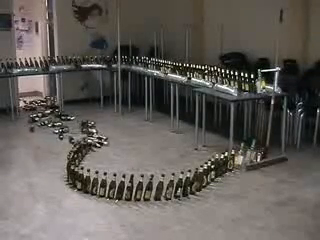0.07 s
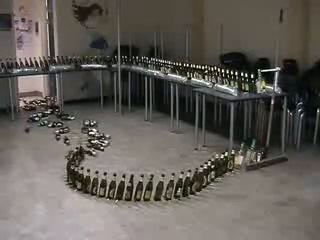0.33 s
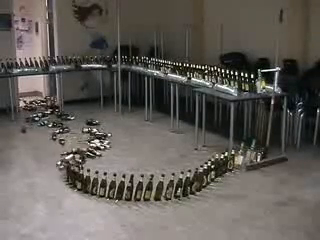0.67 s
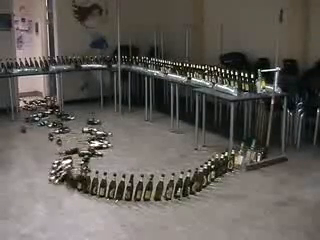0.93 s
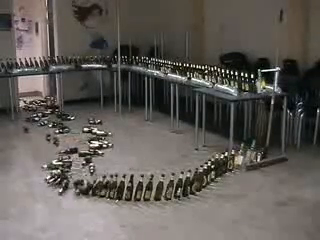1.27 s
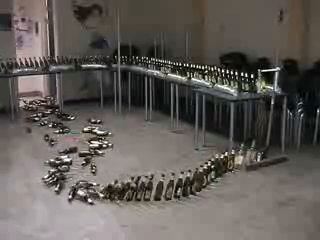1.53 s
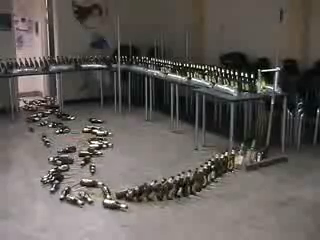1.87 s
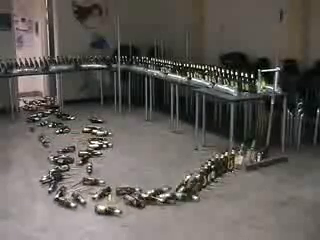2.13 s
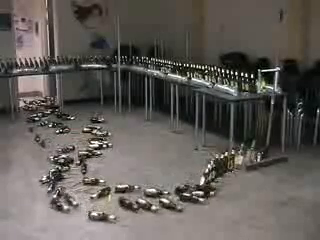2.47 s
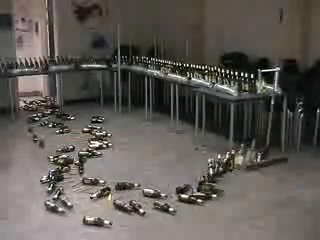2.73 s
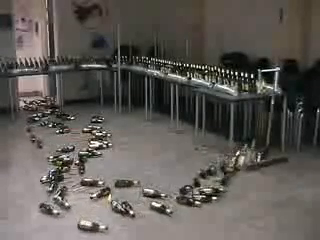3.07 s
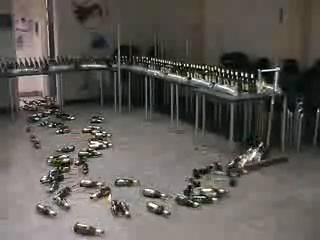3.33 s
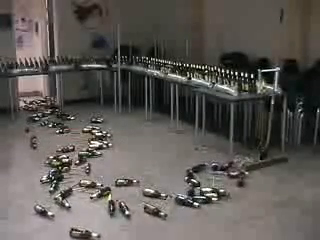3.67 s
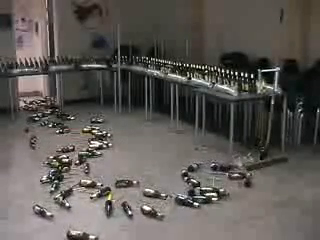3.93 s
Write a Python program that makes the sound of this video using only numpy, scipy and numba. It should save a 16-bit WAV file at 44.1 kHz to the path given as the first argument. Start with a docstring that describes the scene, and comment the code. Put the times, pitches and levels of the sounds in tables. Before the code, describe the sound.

A chain of falling glass bottles makes quick, ringing clinks and sharp clicks over steady rattling on a hard floor. A few larger bottles then collide and drop with a duller clatter, with a short echo from bare walls.

```python
"""Glass bottles topple like dominoes across the concrete floor of a bare room.
Each small bottle strikes its neighbour and rings in a few bright modes; glancing taps ping, hard hits
snap, sliding glass squeaks. The fallen bottles knock on the floor, rattle and roll. After three
seconds the wave reaches a few big bottles that ring lower, and the last ones tumble with a dull,
hollow clatter. The bare walls add a short tail."""
import sys
import numpy as np
from scipy import signal
from scipy.fft import rfft, irfft
from scipy.io import wavfile
from numba import njit

SR = 44100
rng = np.random.default_rng(int(sys.argv[2]) if len(sys.argv) > 2 else 0)


def int16_out(signal):
    """Quantize to a 16-bit WAV file."""
    q = np.round(np.clip(np.atleast_2d(signal).T, -1, 1) * 32767)
    wavfile.write(sys.argv[1], SR, q.astype(np.int16))


N = 176400
TIME = np.arange(N) / SR

# small bottle on small bottle: start_s, level_db, pitch_hz, middle_modes_db
CLINK_CUES = [(0.1186, -12.5, 4113, -13), (0.1997, -15.5, 4190, -15), (0.5411, -17, 4080, -1.5),
              (0.635, -16, 3995, -11), (0.908, -13.5, 4088, -16), (1.0018, -12.5, 4050, -13.5),
              (1.0782, -21.5, 4040, 16), (1.099, -21.5, 4103, 4), (1.1976, -10, 4110, -25.5),
              (1.292, -12, 3988, -1.5), (1.4238, -13.5, 4090, -28), (1.5184, -9.5, 4226, -19.5),
              (1.6105, -12, 4102, -25), (1.7316, -11.5, 4030, -7), (1.8351, -14, 4010, -19),
              (1.916, -13, 3970, -1), (2.157, -17.5, 4047, -2), (2.6564, -16.5, 4190, -0.5),
              (2.8812, -12, 3986, -10), (2.9597, -18, 4045, -11), (3.1007, -15, 4080, -7.5)]
# a small bottle's low pair, middle pair and three top modes: pitch_ratio, level_db, t60_s
SMALL_BOTTLE_MODES = [(0.999, -0.5, 0.1), (1.017, -8.5, 0.11), (1.163, -3, 0.061), (1.199, -3, 0.12),
                      (1.689, -4.5, 0.15), (1.832, -4.5, 0.13), (1.881, -2, 0.095)]
# rattle of the fallen bottles: time_s, level_db
RATTLE_ENVELOPE = [(0, -19), (1.6, -21), (2.6, -18), (3.1, -20.5), (3.55, -33), (4, -40)]
# glancing taps: start_s, level_db, pitch_hz
PING_CUES = [(0.195, -24.5, 7850), (0.6526, -21, 7280), (0.7195, -20.5, 7420), (0.9008, -25, 7500),
             (1.8093, -17.5, 7210), (1.812, -21.5, 7530), (1.914, -22, 7420), (2.243, -22, 7260),
             (2.7457, -16.5, 4905), (2.8424, -18, 4910), (2.994, -17.5, 3490)]
# hard, damped glass contacts: start_s, level_db
SNAP_CUES = [(0.968, -16.5), (1.5215, -12), (1.611, -16), (1.7335, -3.5), (2.1945, -9.5), (2.243, -21),
             (2.994, -4), (3.2095, -11), (3.221, -7)]
# spectrum of a hard glass contact: frequency_hz, level_db
SNAP_EQ = [(300, -39), (1500, -16), (3000, -13), (4100, -10.5), (5300, -5), (6200, -8.5), (8300, -13.5)]
# glass sliding on glass: start_s, level_db, pitch_hz, upper_pitch_hz, length_s
SQUEAK_CUES = [(0.713, -11, 3813, 4517, 0.021), (2.749, -11, 3890, 4470, 0.037)]
# big bottles colliding: start_s, level_db, tilt_db_per_octave
BIG_HIT_CUES = [(3.21, -17, 0), (3.313, -22.5, 0), (3.366, -20, -3), (3.401, -22, -7), (3.617, -22.5, 13),
                (3.646, -23.5, -7.5), (3.80, -29.5, 9)]
# modes of the big bottles: pitch_hz, level_db
BIG_BOTTLE_MODES = [(1917, 0.5), (2746, -7), (2921, -1.5), (2967, -4), (3175, -2.5), (3494, -5),
                    (3643, -7.5), (4015, -8), (4878, 2), (5320, -5.5), (6115, -6.5), (7300, -11.5)]
# jostling of the big bottles: time_s, level_db
CLATTER_ENVELOPE = [(2.8, -74), (3.0, -30.5), (3.2, -47.5), (3.42, -28), (3.57, -53.5), (3.67, -32),
                    (3.95, -75)]
# bottle on concrete: start_s, level_db
KNOCK_CUES = [(.030, -21), (.109, -21), (.191, -20.5), (.2805, -19), (.344, -19.5), (.3965, -23),
              (.478, -22.5), (.549, -24.5), (.647, -20.5), (.805, -21), (.903, -21.5), (1.0785, -19.5),
              (1.363, -20.5), (2.1545, -18.5), (2.195, -17), (2.302, -21), (2.4007, -14), (2.4865, -18),
              (2.5212, -20), (2.5885, -14.5), (2.747, -20), (2.862, -23), (2.994, -18)]
# spectrum of a floor knock: frequency_hz, level_db
KNOCK_EQ = [(80, -36), (200, -18.5), (600, -12), (1000, -5), (1450, 0.5), (1950, -2.5), (2600, -9.5),
            (3400, -24.5), (8000, -28.5)]
# small bounces on the floor: time_s, level_db
BOUNCE_ENVELOPE = [(0, -37.5), (1.1, -36.5), (1.65, -40.5), (2.03, -39.5), (2.2, -38.5), (3.42, -35.5),
                   (3.57, -39), (3.72, -40), (3.95, -53)]
# spectrum of a bounce: frequency_hz, level_db
BOUNCE_EQ = [(100, -35.5), (300, -15), (700, -7.5), (1400, 3.5), (1950, 2), (3300, -17), (5500, -8),
             (8000, -6.5)]
# bottles landing on their sides: peak_s, level_db
TUMBLE_CUES = [(1.381, -45), (1.507, -39), (2.159, -36.5), (2.95, -37), (3.155, -37), (3.65, -43.5),
               (3.736, -32.5), (3.81, -33.5)]
# bottles rolling: time_s, level_db
ROLL_ENVELOPE = [(0, -53), (2.4, -47.5), (3.8, -47), (4, -53)]
# spectrum of a dull bump: frequency_hz, level_db
ROLL_EQ = [(60, -18), (130, -0.5), (200, 3), (300, 5), (480, 0.5), (650, -4.5), (1200, -3.5), (4000, -50.5)]
# decay of the room: frequency_hz, t60_s
ROOM_DECAY = [(150, 0.96), (1500, 0.6), (4000, 0.68), (8000, 0.43)]

BOTTLE_HZ, BOTTLE_SPREAD, MODE_SPREAD = 4058.6, 0.0093, 0.0109  # small bottles; spreads are fractions
CONTACT_S, TOP_HZ = 0.00089, 8350


def clinks(level_db=-4, rebound_s=0.026, rebound_db=-15):
    """Each falling bottle strikes its neighbour and rebounds once."""
    out, attack_s = np.zeros(N), 0.0035  # the bottles chatter as they meet, softening the attack
    draws = rng.standard_normal((len(CLINK_CUES), 2, 3, len(SMALL_BOTTLE_MODES)))
    for (at, db, hz, middle_db), (hit, rebound) in zip(CLINK_CUES, draws):
        add(out, at, amp(db) * small_bottle(hz, middle_db, hit, attack_s))
        rebound_at = at + rebound_s * np.exp(0.31 * rebound[0, 0])
        rebound_ring = small_bottle(BOTTLE_HZ, middle_db, rebound, attack_s)
        add(out, rebound_at, amp(db + rebound_db) * rebound_ring)
    return amp(level_db) * out


def small_bottle(hz, middle_db, draws, attack_s, scatter_db=2, top_db=-10.5):
    """One clink; no two bottles have quite the same wall, so the modes shift, the top ones most."""
    wall, balance, polarity = draws
    ratio, db, t60 = np.array(SMALL_BOTTLE_MODES).T
    group = np.minimum(np.arange(len(ratio)) // 2, 2)  # low, middle, top
    detune = 1 + MODE_SPREAD * wall * (group + 1) / 2 * (ratio != ratio[0])
    gain = amp(db + np.array([0, middle_db, top_db])[group] + scatter_db * balance)
    return ring(hz * ratio * detune, gain * np.sign(polarity), t60, attack_s)


def rattle(level_db=-6, bottles_per_s=13, middle_db=-5.5):
    """The bottle that has just fallen chatters in its own voice, then the next takes over."""
    out = np.zeros(N)
    bottles = rng.standard_normal((2000, 2, len(SMALL_BOTTLE_MODES)))
    polarities = rng.standard_normal((2000, len(SMALL_BOTTLE_MODES)))
    for (at, db), polarity in zip(patter(per_s=125, spread_db=2), polarities):
        wall, balance = bottles[int(max(at, 0) * bottles_per_s)]
        hz = BOTTLE_HZ * (1 + BOTTLE_SPREAD * wall[0])
        voice = (wall, balance - balance[0], polarity)
        add(out, at, amp(db) * small_bottle(hz, middle_db, voice, attack_s=0.0018, scatter_db=1.33))
    return unit(out) * curve(RATTLE_ENVELOPE) * amp(level_db)


def pings(t60_s=0.14):
    """A glancing tap rings one clear mode."""
    out = np.zeros(N)
    for at, db, hz in PING_CUES:
        add(out, at, ring(np.array([float(hz)]), amp([db]), np.array([t60_s]), CONTACT_S))
    return out


def snaps():
    """Damped glass hits hard: a bright click with no ring."""
    return crack(SNAP_CUES, SNAP_EQ, t60_s=0.028, chatter_db=-1)


def squeaks(upper_db=-11):
    """Glass slides on glass: friction drives two modes, which swell and stop with the slide."""
    out = np.zeros(N)
    for at, db, hz, upper_hz, length in SQUEAK_CUES:
        t = TIME[:int(length * SR)]
        tones = np.sin(2 * np.pi * hz * t) + amp(upper_db) * np.sin(2 * np.pi * upper_hz * t)
        add(out, at, amp(db) * np.sin(np.pi * t / length) * tones)
    return out


def big_bottles(level_db=-8, crack_db=20.5, lowest_t60_s=0.41, detune=0.0036):
    """Big bottles crack together and ring lower and longer, in many more modes."""
    hits = [row[:2] for row in BIG_HIT_CUES]
    out = amp(crack_db) * crack(hits, SNAP_EQ, t60_s=0.085, chatter_db=-7)
    hz, mode_db = np.array(BIG_BOTTLE_MODES).T
    t60 = lowest_t60_s * np.sqrt(hz[0] / hz)  # higher modes die sooner
    draws = rng.standard_normal((len(hits), 3, len(hz)))
    for (at, db, tilt), (wall, scatter_db, polarity) in zip(BIG_HIT_CUES, draws):
        gain = amp(db + mode_db + tilt * np.log2(hz / BOTTLE_HZ) + scatter_db)
        add(out, at, ring(hz * (1 + detune * wall), gain * np.sign(polarity), t60, CONTACT_S))
    return amp(level_db) * out


def clatter(detune=0.05, t60_s=0.12):
    """Big bottles of mixed sizes jostle, damped by the heap."""
    out = np.zeros(N)
    hz, mode_db = np.array(BIG_BOTTLE_MODES).T
    hits = patter(per_s=60, spread_db=3)
    for (at, db), (size, balance) in zip(hits, rng.standard_normal((1000, 2, len(hz)))):
        gain = amp(db + mode_db) * balance
        add(out, at, ring(hz * (1 + detune * size), gain, np.full(len(hz), t60_s), CONTACT_S))
    return unit(out) * curve(CLATTER_ENVELOPE)


def floor_contacts(knock_db=7):
    """Glass on concrete: dry knocks, a patter of bounces, the low bumps of rolling and tumbling."""
    bounces = unit(strike(patter(per_s=260, spread_db=2.5), BOUNCE_EQ)) * curve(BOUNCE_ENVELOPE)
    bumps = unit(strike(patter(per_s=330, spread_db=3), ROLL_EQ))
    knocks = amp(knock_db) * crack(KNOCK_CUES, KNOCK_EQ, t60_s=0.042, chatter_db=-1)
    return knocks + bounces + bumps * curve(ROLL_ENVELOPE) + tumbles(bumps)


def tumbles(bumps, rise_s=0.028, t60_s=0.11, hollow_hz=325.7, hollow_db=0.5):
    """A bottle lands on its side: the bumps swell and die away, and the air inside rings hollow."""
    envelope = np.zeros(N)
    for at, db in TUMBLE_CUES:
        swell = np.exp(-((TIME - at) / rise_s) ** 2)
        envelope += amp(db) * np.where(TIME < at, swell, decay(np.abs(TIME - at), t60_s))
    landings = bumps * envelope
    hollow = signal.lfilter(*signal.iirpeak(hollow_hz, Q=20, fs=SR), landings)
    return landings + amp(hollow_db) * hollow


def room(x, wet_db, predelay_s=0.00067, build_s=0.009):
    """Bare walls: a diffuse tail that builds up quickly and dies sooner in the treble."""
    t, log_f = TIME[:SR], np.log(np.maximum(np.arange(SR // 2 + 1), 1))
    hz, t60s = np.array(ROOM_DECAY).T
    noise, tail = rfft(rng.standard_normal(SR)), np.zeros(SR)
    for band, t60 in zip(np.eye(len(hz)), t60s):
        tail += irfft(noise * np.interp(log_f, np.log(hz), band)) * decay(t, t60)
    tail *= np.clip((t - predelay_s) / build_s, 0, 1)
    return x + amp(wet_db) * signal.fftconvolve(x, tail / np.linalg.norm(tail))[:N]


@njit
def ring(hz, gain, t60, attack_s):
    """Modes build up during the contact, then decay."""
    out = np.zeros(int(t60.max() * SR))
    for k in range(len(hz)):
        phasor = gain[k] + 0j
        step = np.exp((2j * np.pi * hz[k] - np.log(1000) / t60[k]) / SR)
        for i in range(len(out)):
            out[i] += phasor.imag * min(i / (attack_s * SR), 1.)
            phasor *= step
    return out


def crack(cues, eq, t60_s, chatter_db):
    """A click and a brief chatter of the same colour on each cue."""
    out, pulse, t = np.zeros(N), contact(eq), TIME[:SR // 10]
    for at, db in cues:
        chatter = rng.standard_normal(len(t)) * decay(t, t60_s)
        force = amp(chatter_db) * chatter / np.linalg.norm(chatter)
        force[0] = 1  # the impact itself
        add(out, at, amp(db) * signal.fftconvolve(force, pulse))
    return out


def strike(cues, eq):
    """One bare click on each cue."""
    out, pulse = np.zeros(N), contact(eq)
    for at, db in cues:
        add(out, at, amp(db) * pulse)
    return out


def contact(eq, size=1024):
    """The tightest click with a given spectrum (minimum phase), peak 1."""
    hz, db = np.array(eq).T
    f = np.maximum(np.arange(size // 2 + 1) * SR / size, 1)
    spectrum = amp(np.interp(np.log(f), np.log(hz), db)) / (1 + (f / TOP_HZ) ** 10)
    cepstrum = irfft(np.log(spectrum))
    cepstrum[1:size // 2] *= 2
    cepstrum[size // 2 + 1:] = 0
    pulse = irfft(np.exp(rfft(cepstrum)))
    return pulse / np.abs(pulse).max()


def patter(per_s, spread_db, count=2000):
    """Irregular cues at a mean rate: start_s, level_db."""
    start_s = (np.arange(count) + 2 * rng.random(count) - 1) / per_s
    level_db = spread_db * np.clip(rng.standard_normal(count), -2, 2)
    return np.c_[start_s, level_db][start_s < N / SR]


def amp(db):
    """Decibels to gain."""
    return 10 ** (np.asarray(db) / 20)


def decay(t, t60_s):
    """A fade that falls 60 dB in t60_s."""
    return np.exp(-np.log(1000) * t / t60_s)


def curve(envelope):
    """Gain over time from time_s, level_db breakpoints."""
    return amp(np.interp(TIME, *np.array(envelope).T))


def unit(x):
    """Scale to rms 1."""
    return x / np.sqrt(np.mean(x ** 2))


def add(out, at, sound):
    """Mix a sound in at a time in seconds."""
    i = max(int(at * SR), 0)
    part = sound[:max(N - i, 0)]
    out[i:i + len(part)] += part


def scene():
    """Ringing glass, damped glass, floor and big bottles in mono, each with its own reverb send."""
    ringing = clinks() + pings() + rattle()
    damped = snaps() + squeaks()
    mix = room(ringing, wet_db=-8) + room(damped, wet_db=-13)
    mix += room(floor_contacts(), wet_db=-4.5)
    mix += room(big_bottles() + clatter(), wet_db=-3)
    return mix[None]


def record(dry, ceiling=0.42, low_hz=100):
    """A small microphone that rounds the peaks, sheds the bass and cuts the top."""
    rounded = ceiling * np.tanh(dry / ceiling)
    thinned = signal.sosfilt(signal.butter(2, low_hz, "high", fs=SR, output="sos"), rounded)
    return signal.sosfilt(signal.ellip(12, .2, 75, TOP_HZ, fs=SR, output="sos"), thinned)


dry = scene()
out = record(dry)
int16_out(out)
```